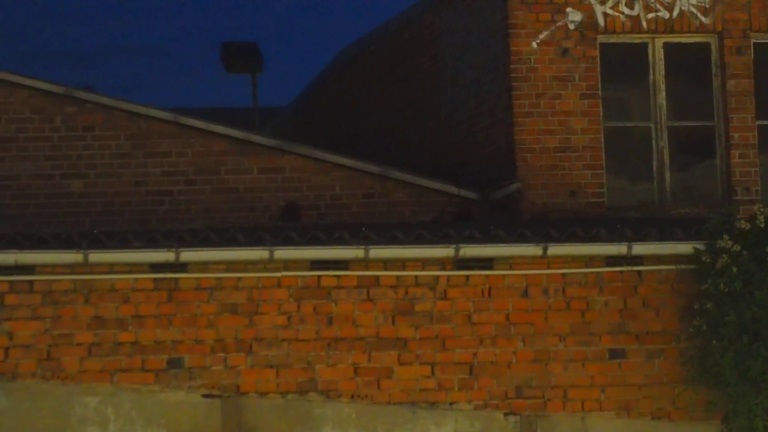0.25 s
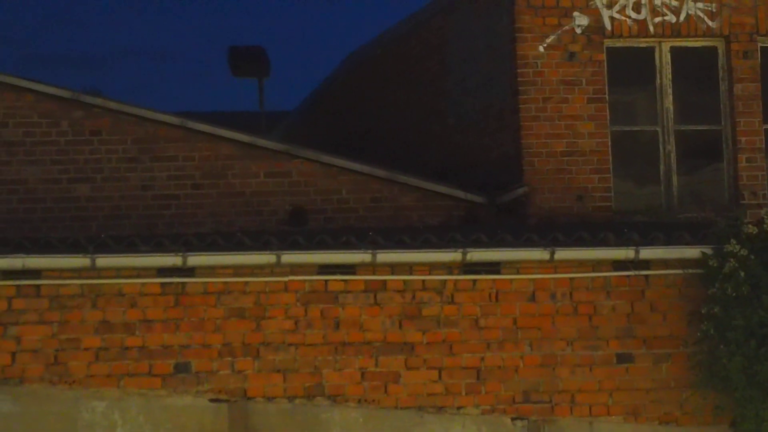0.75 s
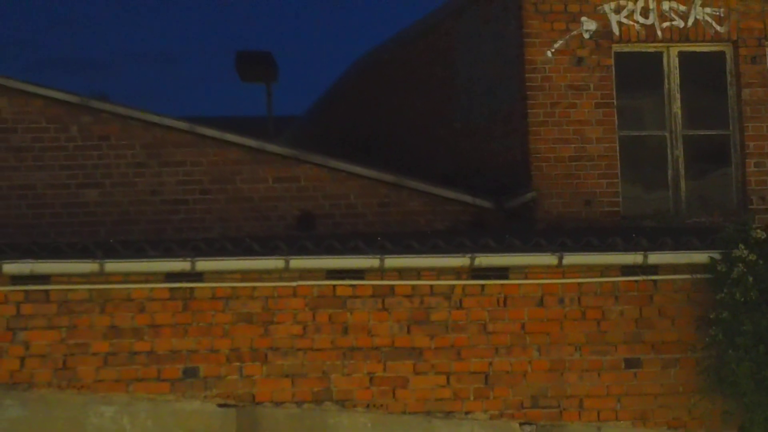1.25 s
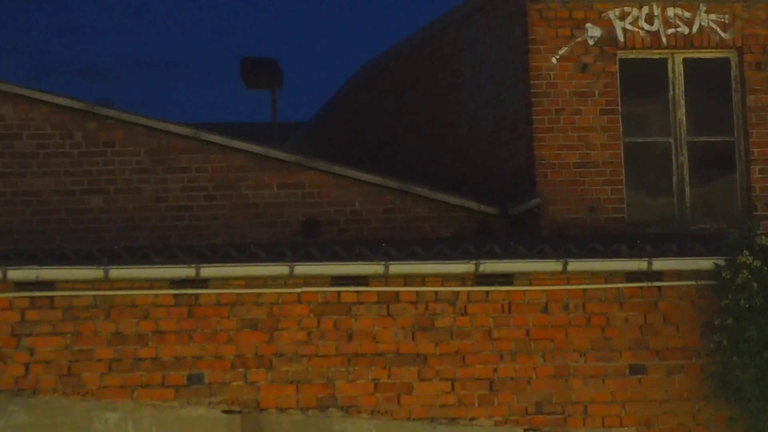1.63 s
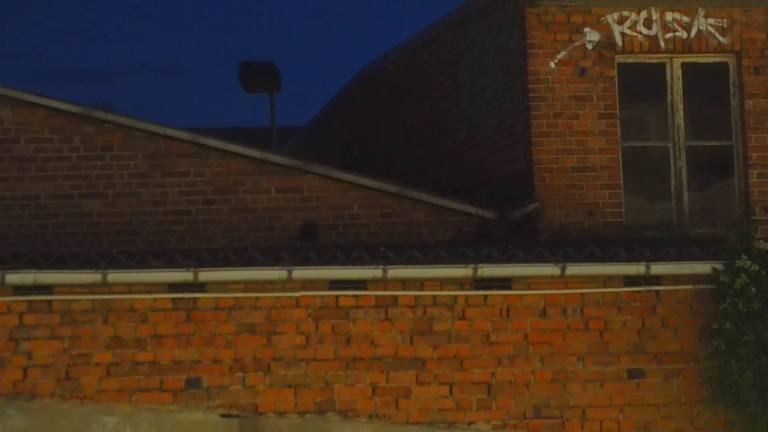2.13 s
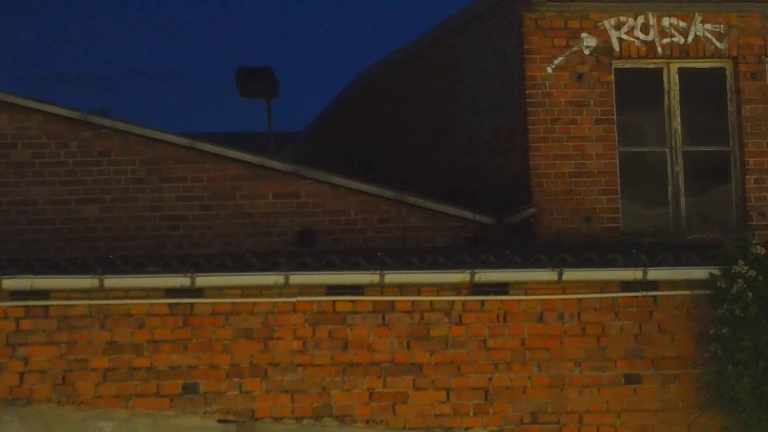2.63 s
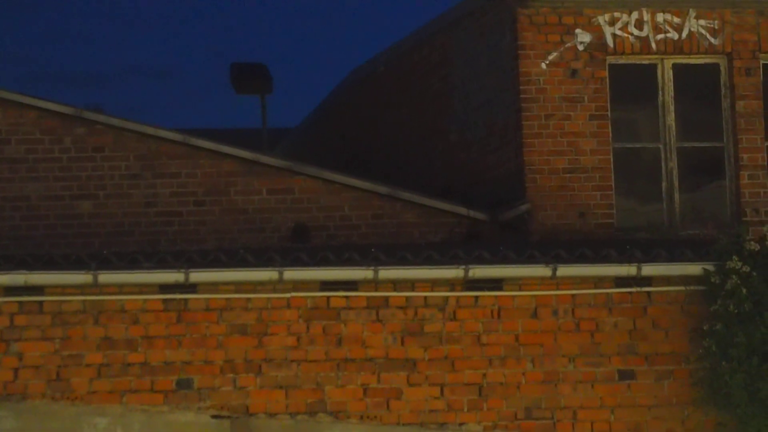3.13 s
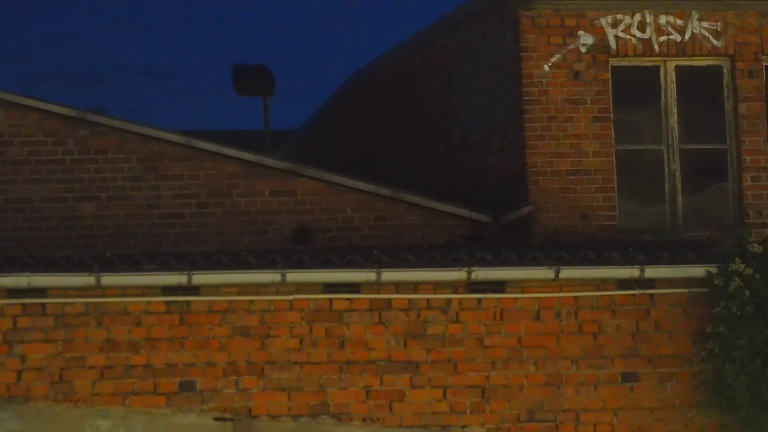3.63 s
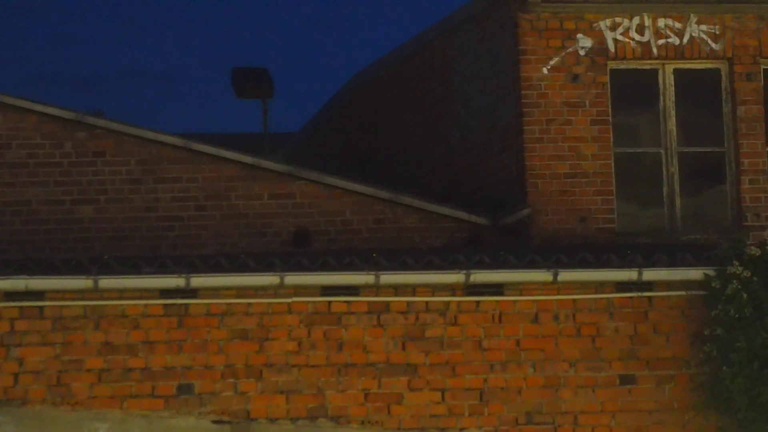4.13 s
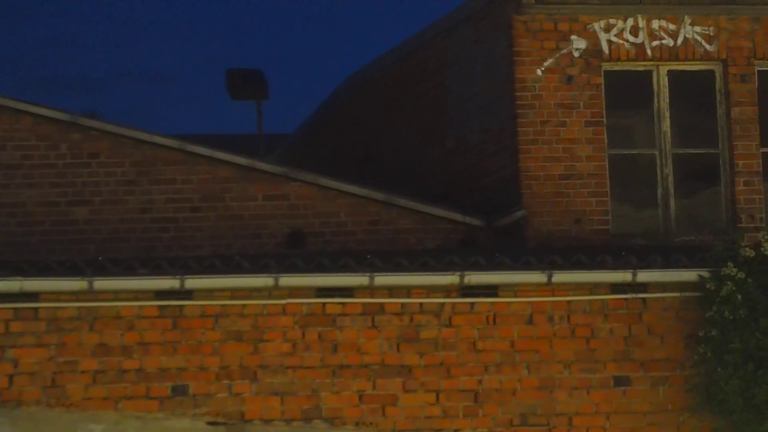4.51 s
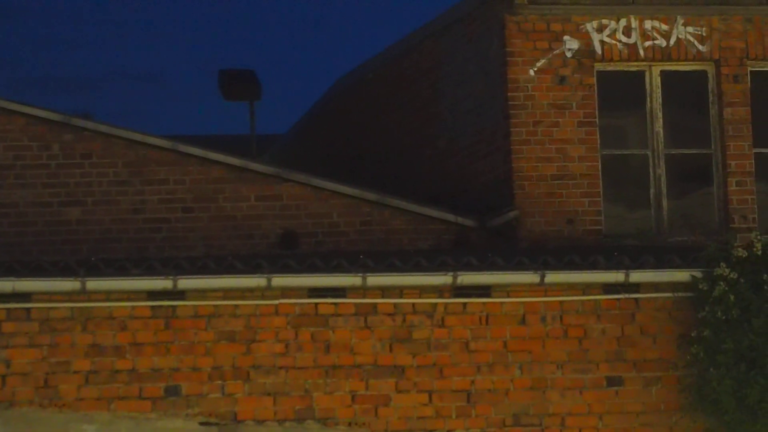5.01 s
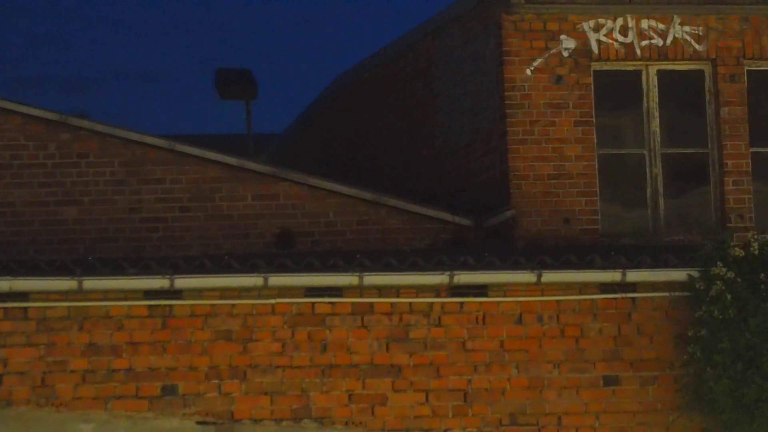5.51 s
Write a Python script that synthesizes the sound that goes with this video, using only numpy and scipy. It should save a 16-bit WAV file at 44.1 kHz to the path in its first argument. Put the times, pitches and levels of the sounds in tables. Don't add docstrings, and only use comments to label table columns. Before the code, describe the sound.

A stereo camera microphone picks up soft town rumble and hiss. About a second and a half in, a songbird at left utters a faint whistle, fluttering warbles and a louder trill with short brick-wall echoes. A distant bird at right whistles and trills softly. The first returns with bursts of dry, scratchy crackle that grow loudest near the end, then a dropping chirp and buzz.

```python
import sys
import numpy as np
from scipy import signal
from scipy.fft import rfft, irfft, next_fast_len
from scipy.io import wavfile
from scipy.ndimage import uniform_filter1d

SR = 44100
rng = np.random.default_rng(int(sys.argv[2]) if len(sys.argv) > 2 else 0)


def unload_audio(sound):
    columns = np.transpose(np.atleast_2d(sound))
    steps = np.round(np.clip(columns, -1, 1) * 32767)
    wavfile.write(sys.argv[1], SR, steps.astype(np.int16))


def magnitude_from_level(level_db):
    exponent = np.asarray(level_db, float) / 20
    return 10 ** exponent


N = 254099
T = np.arange(N) / SR
SIZE = next_fast_len(N + SR)
HZ = np.maximum(np.arange(SIZE // 2 + 1) * SR / SIZE, 1)
TOP_HZ = 15900


def on_hz(table):
    hz, value = np.transpose(table)
    return np.interp(np.log(HZ), np.log(hz), value)


def colour(x, gain):
    return irfft(rfft(x, SIZE) * gain, SIZE)[..., :N]


def level(x, db):
    return x * magnitude_from_level(db) / np.sqrt(np.mean(x ** 2))


def wander(rate_hz):
    k = int(SR / rate_hz)
    smooth = uniform_filter1d(uniform_filter1d(rng.standard_normal(N), k), k)
    return level(smooth, 0)


# (frequency [Hz], density [dB per Hz])
TOWN_SPECTRUM = [(15, -7), (25, -8.5), (54, 1), (70, -6), (106, -3.5), (167, -3.5), (249, -3.5),
                 (352, -10.5), (441, -8), (482, -9.5), (593, -6), (826, -15), (1090, -9.5), (1370, -12),
                 (1600, -19), (2080, -112), (3520, -120)]
# (frequency [Hz], density [dB per Hz])
HISS_SPECTRUM = [(940, -37), (1600, -4.5), (2020, -2), (2690, -5.5), (2940, 2), (3170, -2.5), (4490, -4),
                 (5870, -6.5), (6590, -15), (8070, -8), (9420, -11.5), (10400, -21.5), (12300, -12),
                 (15100, -16.5), (16000, -10)]
# (frequency [Hz], likeness [0-1])
PORT_LIKENESS = [(60, 0.6), (130, 0.32), (290, 0.58), (640, 0.36), (1410, 0.31), (3100, 0), (6820, 0),
                 (15000, -0.02)]
# (frequency [Hz], level [dB rms])
MAINS_HUM = [(50, -91), (100, -66), (150, -81.5), (200, -71)]
# (time [s], level [dB])
TOWN_SWELL = [
    (0, 0.1),
    (.9, 0.2),
    (1.2, 0.2),
    (1.6, -0.33),
    (4.9, -0.5),
    (5.3, 1.1),
    (5.76, 1.5),
]


def town():
    alike = np.clip(on_hz(PORT_LIKENESS), 0, 1)
    mid, side, left, right = rng.standard_normal((4, N))
    mid = colour(mid, np.sqrt(1 + alike))
    side = colour(side, np.sqrt(1 - alike))
    traffic = colour(np.array([mid + side, mid - side]), magnitude_from_level(on_hz(TOWN_SPECTRUM)) * (HZ < 1700))
    hiss = colour(np.array([left, right]), magnitude_from_level(on_hz(HISS_SPECTRUM)) * (HZ > 1500))
    mains = sum(magnitude_from_level(db + 3.5 + 1.14 * wander(14.3)) * np.sin(2 * np.pi * hz * T) for hz, db in MAINS_HUM)
    swell = magnitude_from_level(np.interp(T, *np.transpose(TOWN_SWELL)))
    return mains + level(traffic, -53.2) * swell + level(hiss, -57.5)


# (multiple of pitch, level [dB])
SYRINX_OVERTONES = [(2, -37), (3, -37), (4, -44)]


def syrinx(hz, gain, edge):
    phase = 2 * np.pi * np.cumsum(hz * (1 + 0.00315 * wander(303))) / SR
    overtones = sum(magnitude_from_level(db) * (k * hz < TOP_HZ) * np.sin(k * phase) for k, db in SYRINX_OVERTONES)
    tone = np.sin(phase) + edge * (1 + 0.8 * wander(1500)) * overtones
    return gain * magnitude_from_level(0.9 * wander(200)) * tone


def held_note(curve):
    s, hz, db = np.transpose(curve)
    ends = np.clip(np.minimum(T - s[0], s[-1] - T) / 0.004, 0, 1)
    return syrinx(np.interp(T, s, hz), ends * magnitude_from_level(np.interp(T, s, db)), edge=magnitude_from_level(-13))


# (time [s], pitch [Hz], level [dB])
OPENING_CURVE = [
    (1.594, 4300, -62),
    (1.604, 4470, -34.5),
    (1.614, 4435, -39),
    (1.62, 4400, -43),
    (1.67, 4700, -72),
    (1.732, 4530, -52),
]


def opening_whistle():
    return held_note(OPENING_CURVE)


# (frequency [Hz], level [dB])
AIR_SPECTRUM = [(1200, -66), (1900, -27.5), (2600, -34.5), (5000, -29), (5900, -14), (6600, -24.5),
                (8000, -19.5), (10000, -31), (11500, -57), (14500, -39), (16000, -46)]


def rush(notes, full=0.1):
    strength = uniform_filter1d(abs(notes), size=88)
    air = strength * np.sqrt(abs(strength) / full) * rng.standard_normal(N)
    return colour(air, magnitude_from_level(on_hz(AIR_SPECTRUM) + 2))


# (delay [s], level [dB])
WALL_ECHOES = [
    (.01, -16),
    (.027, -19),
    (.045, -21),
    (.062, -24),
]


def walls(x, db, t60_s, echo_db, rough_s=0.002):
    t = T[:SR]
    decay = (magnitude_from_level(-60 * t / t60_s) + magnitude_from_level(-14 - 42 * t)) * np.clip(t / 0.02, 0, 1)
    tail = rng.standard_normal((2, SR)) * decay
    tail *= magnitude_from_level(db) / np.sqrt(np.sum(tail ** 2, axis=1, keepdims=True))
    for late_s, wall_db in WALL_ECHOES:
        brick = rng.standard_normal((2, SR)) * (t > late_s) * np.exp(-abs(t - late_s) / rough_s)
        tail += magnitude_from_level(wall_db + echo_db) * brick / np.sqrt(np.sum(brick ** 2, axis=1, keepdims=True))
    return colour(x, rfft(tail, SIZE) / np.sqrt(1 + (HZ / 10000) ** 4))


def run(curve, first_s, count, gap_ms, slows_ms, uneven_db=0):
    k = np.arange(count)
    place, hz, db = np.transpose(curve)
    s = first_s + k * (gap_ms + slows_ms * (k - 1) / 2) / 1000
    note_db = np.interp(k / k[-1], place, db) + uneven_db * rng.standard_normal(count)
    return zip(s, np.interp(k / k[-1], place, hz), note_db)


def arches(notes, rise_ms, fall_ms, from_hz, to_hz, swell, fade, bend=1.7, dull_db=-14):
    hz, gain, edge = np.full(N, 1. * from_hz), np.zeros(N), np.ones(N)
    for s, top_hz, db in notes:
        u = (T - s) * 1000 / np.where(T < s, rise_ms, fall_ms)
        on = abs(u) < 1
        u = u[on]
        rise_drop_hz = (top_hz - from_hz) * abs(u) ** 2.5
        fall_drop_hz = (top_hz - to_hz) * abs(u) ** bend
        hz[on] = top_hz - np.where(u < 0, rise_drop_hz, fall_drop_hz)
        envelope = np.clip(np.minimum((1 + u) / swell, (1 - u) / fade), 0, 1)
        gain[on] = magnitude_from_level(db) * np.sin(np.pi / 2 * envelope)
        edge[on] = magnitude_from_level(dull_db * (1 + u) / 2)
    return syrinx(hz, gain, edge)


# (place in run [0-1], top [Hz], level [dB])
SOFT_WARBLE_EFFORT = [
    (0, 4300, -41),
    (.2, 4050, -36),
    (.7, 4150, -30),
    (1, 4100, -35),
]


def soft_warble():
    notes = run(SOFT_WARBLE_EFFORT, first_s=1.739, count=6, gap_ms=16.9, slows_ms=0.18)
    return magnitude_from_level(1.5) * arches(notes, rise_ms=5, fall_ms=8, from_hz=3800, to_hz=3400,
                             swell=1.5, fade=0.45, bend=1.3)


# (place in run [0-1], top [Hz], level [dB])
LOUD_WARBLE_EFFORT = [
    (0, 4150, -32),
    (.8, 4280, -24.5),
    (1, 4250, -25.5),
]


def loud_warble():
    notes = run(LOUD_WARBLE_EFFORT, first_s=1.8873, count=7, gap_ms=18.4, slows_ms=0.18)
    return magnitude_from_level(3) * arches(notes, rise_ms=5.3, fall_ms=8.7, from_hz=3800, to_hz=3150,
                           swell=1.6, fade=0.35, bend=1.4)


# (time [s], pitch [Hz], level [dB])
SQUEAK_CURVE = [
    (1.89, 5000, -56),
    (1.897, 4840, -45),
    (1.906, 4600, -54),
]


def squeak():
    return held_note(SQUEAK_CURVE)


# (time of top [s], top [Hz], level [dB])
TRILL_NOTES = [
    (2.0681, 5070, -22.7),
    (2.1206, 5130, -21.1),
    (2.1891, 5180, -19.3),
    (2.2587, 5240, -18.1),
    (2.327, 5270, -17.9),
    (2.3975, 5280, -17.5),
    (2.4709, 5280, -17.3),
    (2.545, 5280, -17),
    (2.6355, 5250, -19.6),
]


def trill():
    return magnitude_from_level(-0.3) * arches(TRILL_NOTES, rise_ms=12.4, fall_ms=27, from_hz=2900, to_hz=2600,
                              swell=0.33, fade=0.7, bend=1.5)


# (time [s], pitch [Hz], level [dB])
FAR_WHISTLE_CURVES = [
    [(3.12, 4500, -66), (3.135, 4500, -58), (3.17, 4450, -68)],
    [(3.27, 4450, -72), (3.31, 4480, -62), (3.335, 4520, -55), (3.355, 4050, -59)],
]
# (place in run [0-1], top [Hz], level [dB])
FAR_TRILL_EFFORT = [
    (0, 5350, -45),
    (.25, 5480, -42),
    (.7, 5540, -42.5),
    (1, 5480, -49),
]


def far_bird():
    notes = run(FAR_TRILL_EFFORT, first_s=3.43, count=15, gap_ms=47.5, slows_ms=0.15, uneven_db=1)
    far = arches(notes, rise_ms=12, fall_ms=30, from_hz=4300, to_hz=3600, swell=0.8, fade=0.25)
    far += magnitude_from_level(10.5) * sum(map(held_note, FAR_WHISTLE_CURVES))
    late = np.exp(-2j * np.pi * HZ * 4 / SR)
    direct = magnitude_from_level(-6) * np.array([colour(far, late), far])
    return direct + walls(far, db=-10, t60_s=0.7, echo_db=1)


# (time of peak [s], peak [dB], held [s], sag [dB per s])
AIR_PUSHES = [
    (4.59, -54.5, .02, 10),
    (4.645, -42, 0.0062, 10),
    (4.828, -34.5, 0.19, 53),
    (4.985, -34, .055, 100),
    (5.058, -27.5, 0.16, 54),
    (5.325, -19, .095, 184),
    (5.447, -21.5, 0.049, 5),
    (5.565, -29, 0.013, 5),
]


def effort():
    push_db_per_s, release_db_per_s = 520, 416
    pushes = []
    for s, db, held_s, sag in AIR_PUSHES:
        held_db = np.minimum(push_db_per_s * (T - s), -sag * (T - s))
        pushes.append(db + held_db - release_db_per_s * np.maximum(T - s - held_s, 0))
    return uniform_filter1d(np.maximum(np.max(pushes, axis=0), -120), size=500)


# (time [s], peak [dB])
LOUD_CLICKS = [(4.6336, -31), (4.7992, -35), (4.8386, -25), (4.8674, -24), (4.8769, -21), (4.9764, -22),
               (4.9971, -22), (5.0049, -23), (5.0591, -21), (5.0669, -21), (5.0856, -22), (5.0993, -20),
               (5.1089, -18), (5.1124, -19), (5.1385, -17), (5.1949, -20), (5.2028, -19), (5.221, -19),
               (5.2279, -20), (5.2328, -25), (5.2986, -20), (5.3405, -14), (5.3571, -15), (5.3726, -17),
               (5.4098, -17), (5.4545, -14), (5.4705, -14), (5.5188, -16), (5.5597, -17), (5.7112, -21)]


def clicks(effort_db):
    lesser_count, lesser_db, lesser_scatter_db = 90, 3, 2.5
    pitch_hz, climb_hz_per_s, scatter_hz = 4600, 900, 150
    start, end = AIR_PUSHES[0][0], AIR_PUSHES[-1][0]
    at = rng.uniform(start, end, lesser_count)
    db = np.interp(at, T, effort_db) + lesser_db + lesser_scatter_db * rng.standard_normal(len(at))
    at, db = np.concatenate([np.transpose(LOUD_CLICKS), [at, db]], axis=1)
    hz = pitch_hz + climb_hz_per_s * (at - start) + scatter_hz * rng.standard_normal(len(at))
    return zip(at, db, hz)


# (frequency [Hz], level [dB])
RATTLE_SPECTRUM = [(710, -50), (1200, -49), (1870, -23.5), (2400, -25.5), (3250, -10.5), (4450, 5),
                   (5710, 4), (6150, 4.5), (6600, -20.5), (8080, -25), (9800, -34.5), (10400, -50),
                   (11100, -36), (14500, -29)]


def rattle(per_s=2600, scatter_db=1.7, click_ms=0.32, ring_db=-0.6, edge_db=-14):
    effort_db = effort()
    happens, size, sign = rng.random((N, 3)).T
    snaps = (happens < per_s / SR) * magnitude_from_level(-scatter_db * np.log(size + 1e-9)) * np.sign(sign - 0.5)
    snaps /= np.std(snaps)
    body = magnitude_from_level(on_hz(RATTLE_SPECTRUM))
    body /= np.sqrt(np.mean(body ** 2))
    low = colour(snaps, body * (HZ < 3900)) * magnitude_from_level(0.71 * (effort_db + 26.5) - 29)
    core = colour(snaps, body * (HZ >= 3900) * (HZ < 6600)) * magnitude_from_level(effort_db - 6)
    breath = 1.06 * snaps + 1.4 * rng.standard_normal(N)
    hiss = colour(breath, body * (HZ >= 6600)) * magnitude_from_level(1.45 * (effort_db + 27.0) - 25.0)
    sound, edge = low + core + hiss, np.zeros(N)
    for at, peak_db, hz in clicks(effort_db):
        i = slice(int((at - 0.003) * SR), int((at + 0.003) * SR))
        t = T[i] - at
        ring = np.exp(-0.5 * (1000 * t / click_ms) ** 2) * np.cos(2 * np.pi * hz * t * (1 - 60 * t))
        sound[i] += magnitude_from_level(peak_db + ring_db) * ring
        edge[int(at * SR)] = magnitude_from_level(peak_db + edge_db)
    return sound + colour(edge, body) / irfft(body, SIZE)[0]


# (time [s], pitch [Hz], level [dB])
CLOSING_CURVE = [
    (5.583, 3510, -31),
    (5.599, 3610, -25.5),
    (5.603, 3720, -15),
    (5.62, 3848, -20),
    (5.633, 3826, -20),
    (5.64, 3443, -19),
    (5.65, 3390, -23),
    (5.656, 3000, -58.5),
]


def closing_whistle():
    return held_note(CLOSING_CURVE)


# (place in run [0-1], top [Hz], level [dB])
BUZZ_EFFORT = [
    (0, 5750, -26),
    (.4, 5760, -16.5),
    (.8, 5560, -14.5),
    (1, 5500, -17),
]


def buzz():
    notes = run(BUZZ_EFFORT, first_s=5.7102, count=6, gap_ms=7.9, slows_ms=0.29)
    return magnitude_from_level(4) * arches(notes, rise_ms=3.5, fall_ms=4.6, from_hz=4400, to_hz=3950,
                           swell=1.4, fade=0.45, bend=1.4)


# (frequency [Hz], gain [dB])
NOTE_GAIN = [(2300, -1), (3000, -3), (3700, 1), (4500, -0.5), (5300, -1.2), (6000, -6), (6600, -7),
             (8000, 11), (9700, 10.5), (10400, 0), (11000, 8), (12500, 7), (14500, 20.5), (16000, 11)]
# (frequency [Hz], gain [dB])
BODY_SHADOW = [(2500, -1), (3300, -4.5), (3800, -4), (4400, -4.5), (5300, -4.5), (7000, -2.5), (10000, -3),
               (15000, -1)]


def near_bird():
    notes = opening_whistle() + soft_warble() + loud_warble() + squeak() + trill()
    notes += closing_whistle() + buzz()
    near = colour(notes, magnitude_from_level(on_hz(NOTE_GAIN))) + rush(notes) + rattle()
    late = np.exp(-2j * np.pi * HZ * 2 / SR)
    direct = np.array([near, colour(near, magnitude_from_level(on_hz(BODY_SHADOW)) * late)])
    return direct + walls(near, db=-7.5, t60_s=0.63, echo_db=5.0)


def scene():
    return town() + near_bird() + far_bird()


def roll_off(x):
    return signal.sosfilt(signal.butter(12, 16830, fs=SR, output="sos"), x)


def record(dry):
    cut = colour(dry, np.clip((TOP_HZ - HZ) / 150, 0, 1))
    mix = cut - 0.0029
    return roll_off(mix)


dry = scene()
out = record(dry)
unload_audio(out)
```